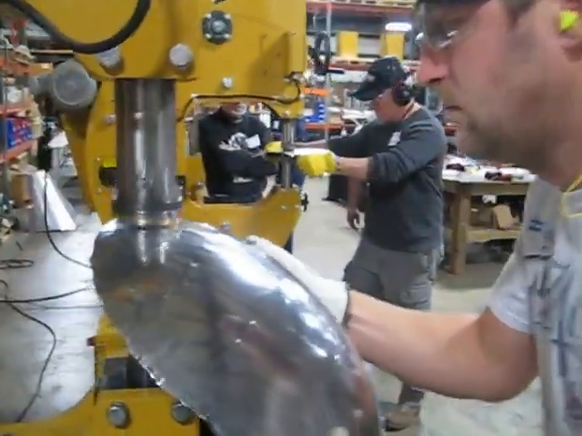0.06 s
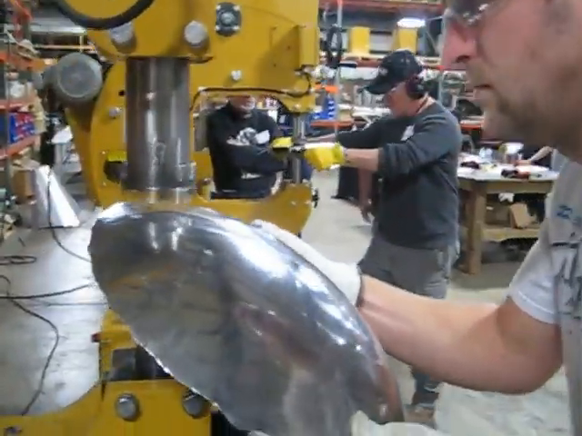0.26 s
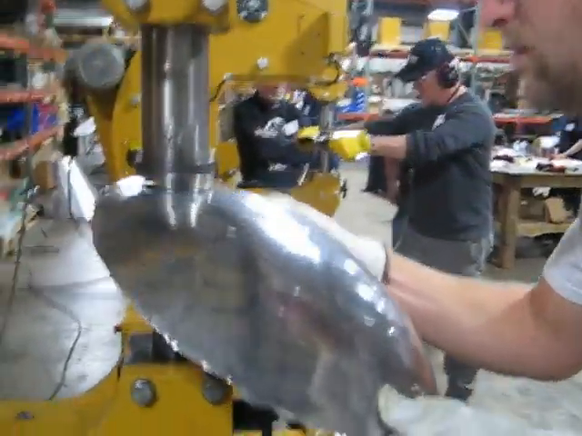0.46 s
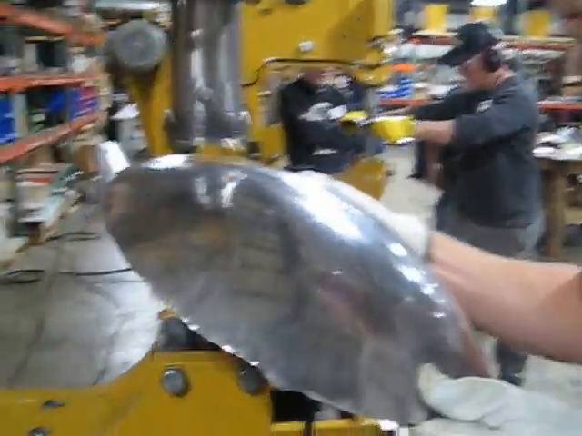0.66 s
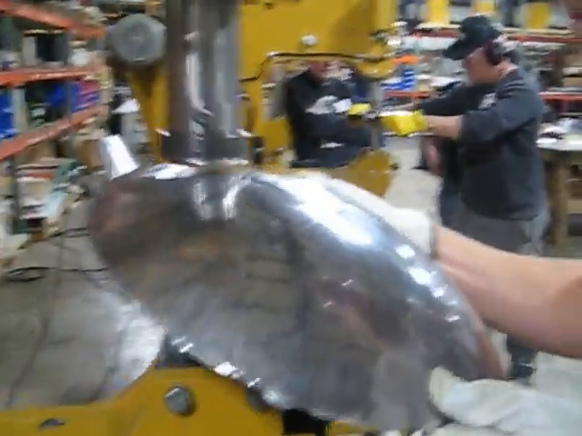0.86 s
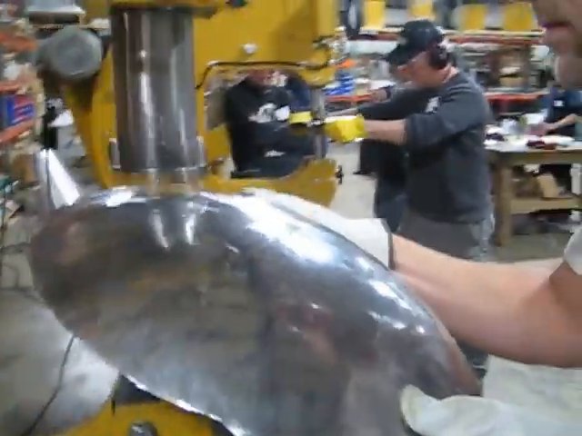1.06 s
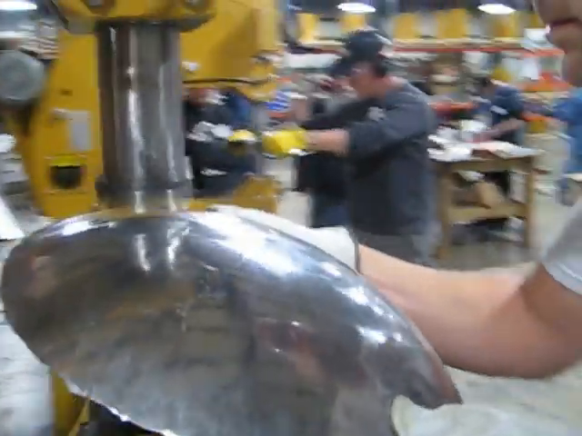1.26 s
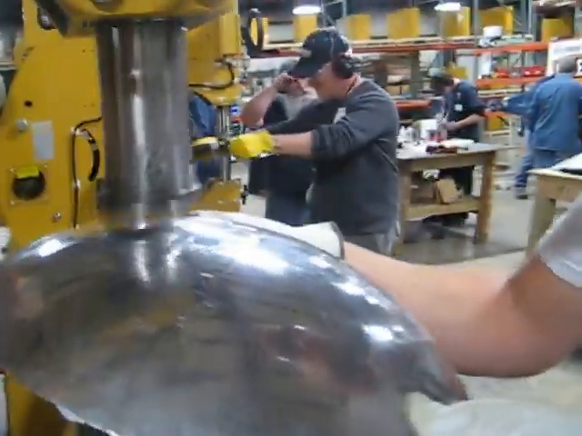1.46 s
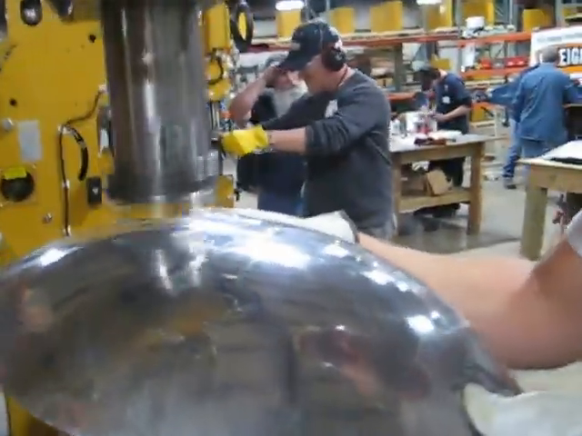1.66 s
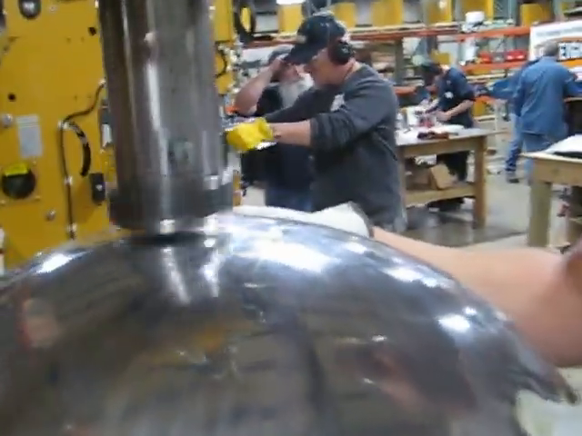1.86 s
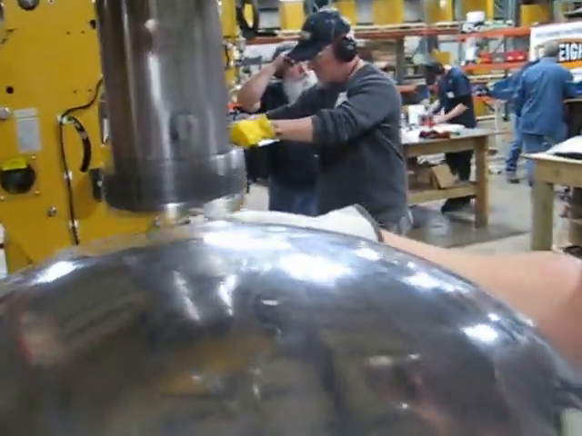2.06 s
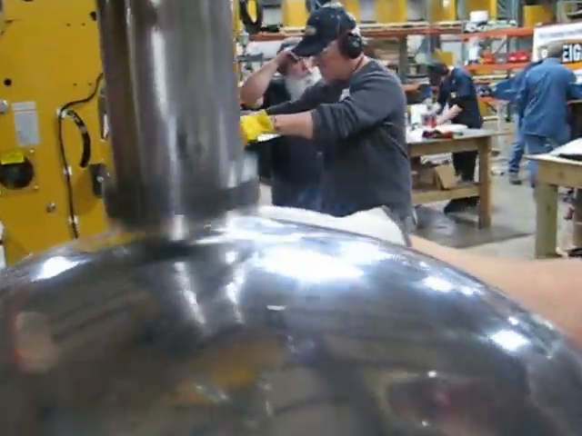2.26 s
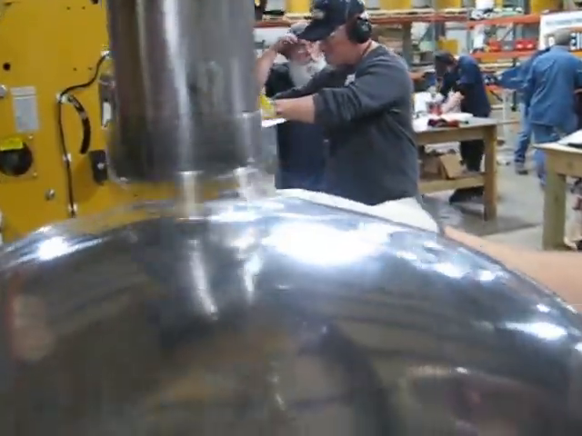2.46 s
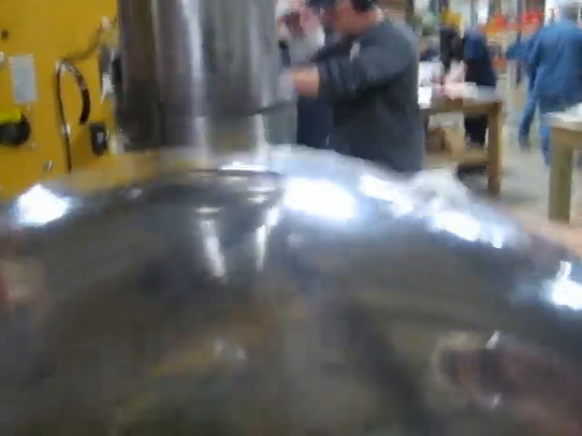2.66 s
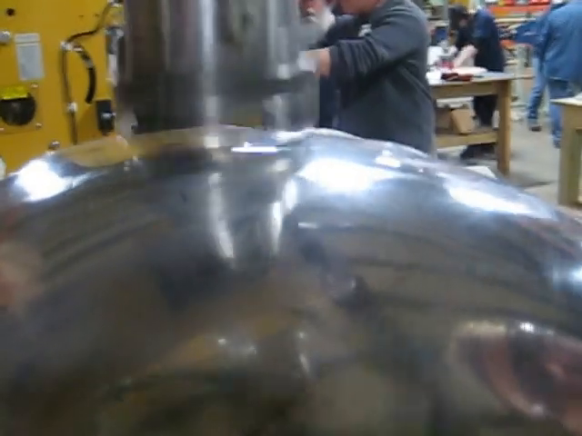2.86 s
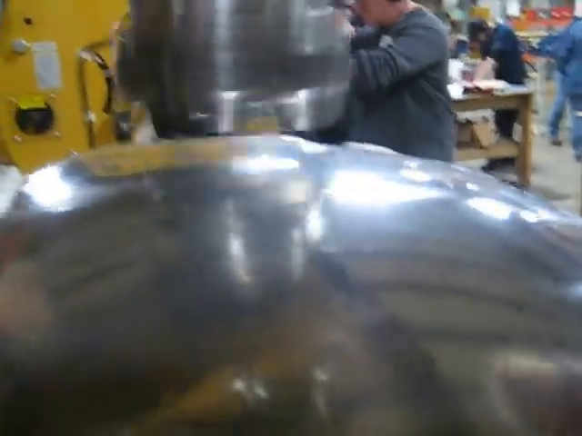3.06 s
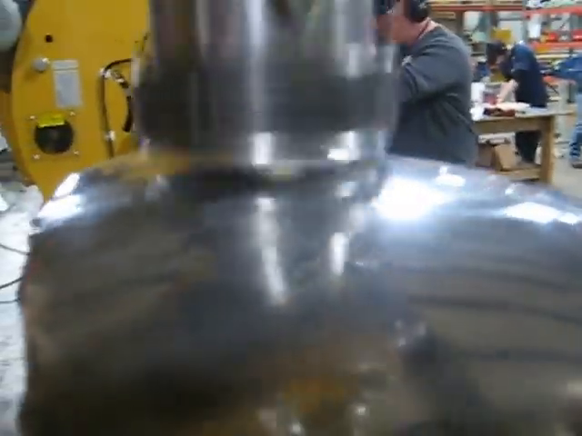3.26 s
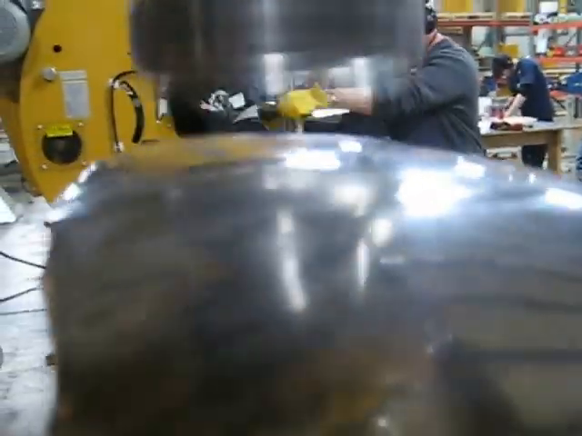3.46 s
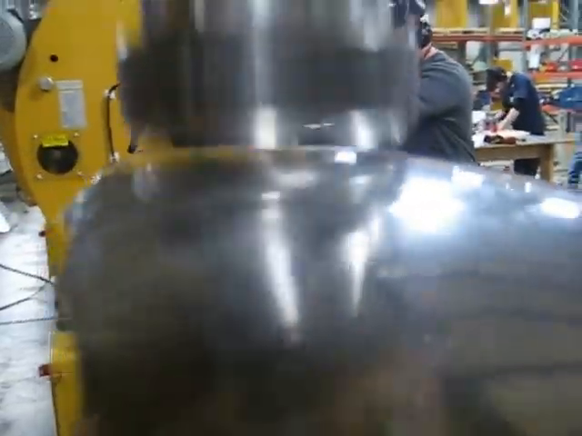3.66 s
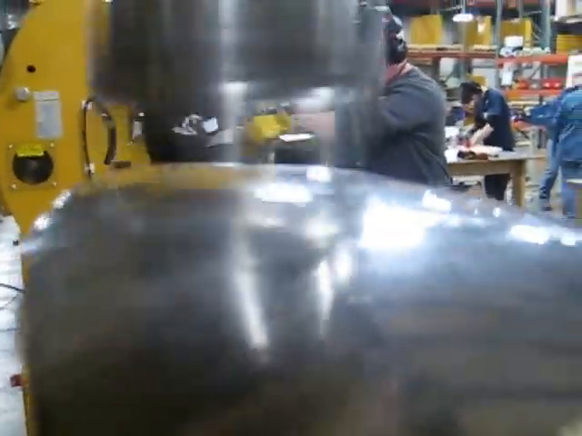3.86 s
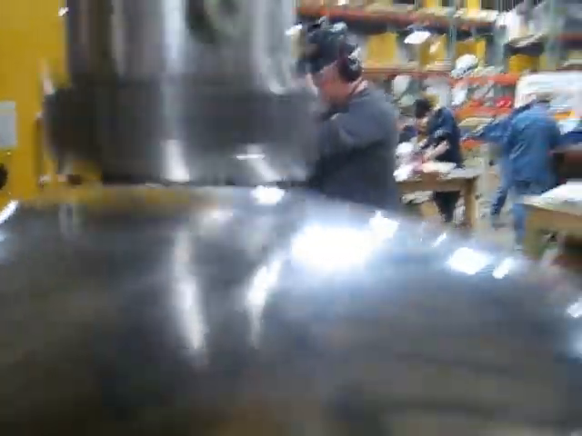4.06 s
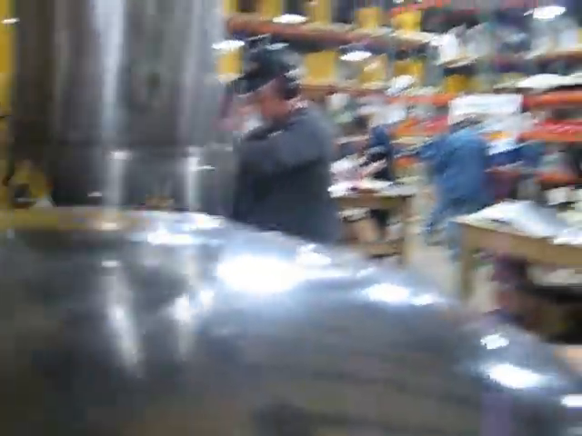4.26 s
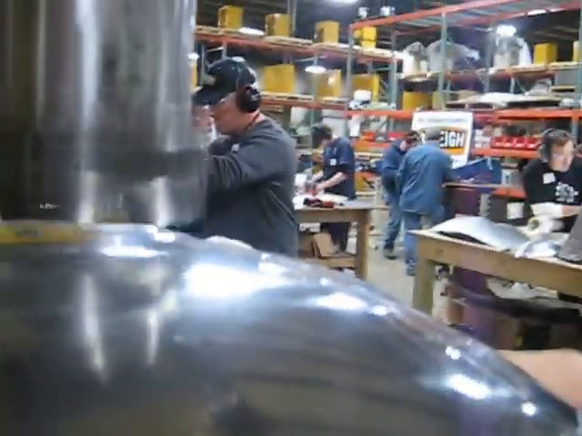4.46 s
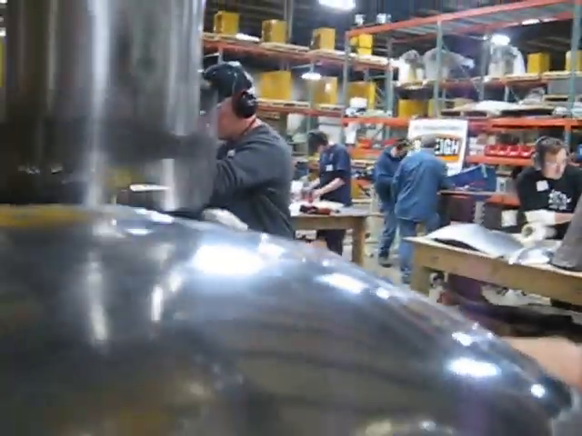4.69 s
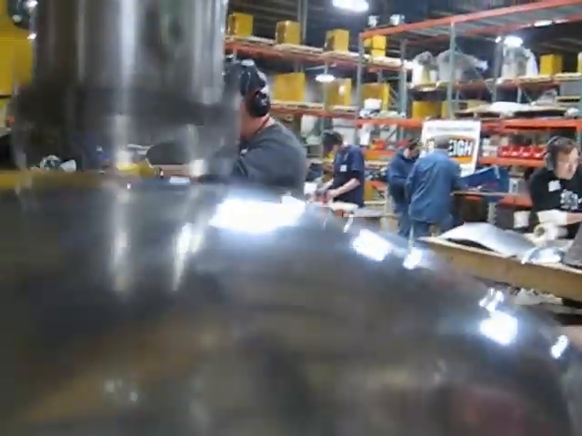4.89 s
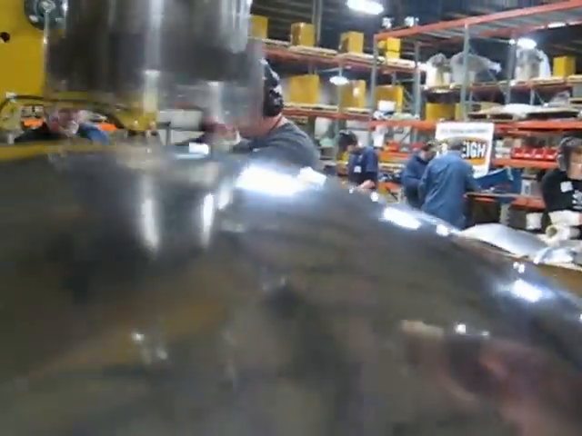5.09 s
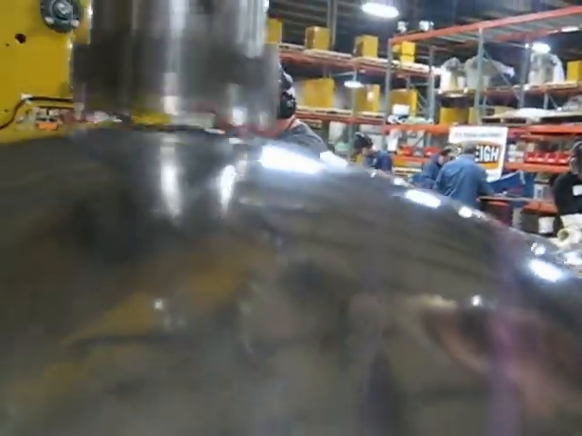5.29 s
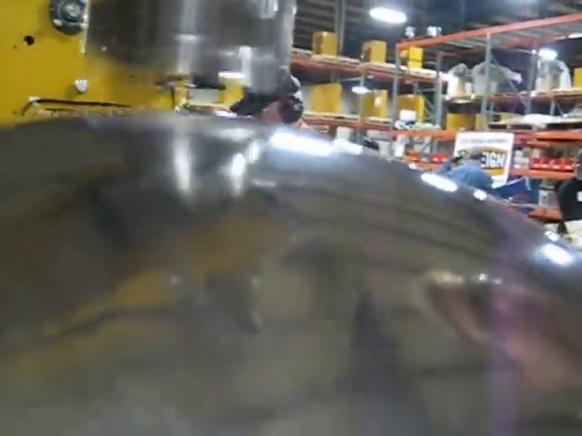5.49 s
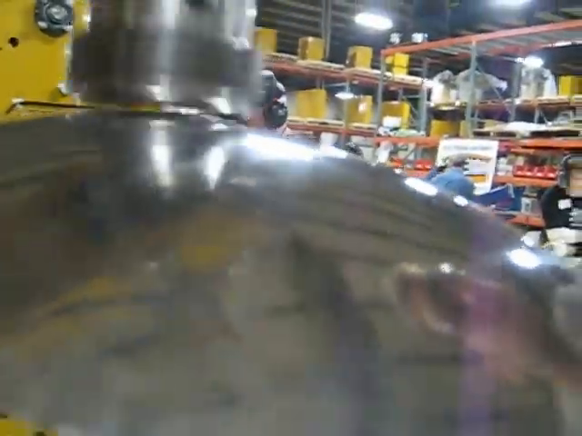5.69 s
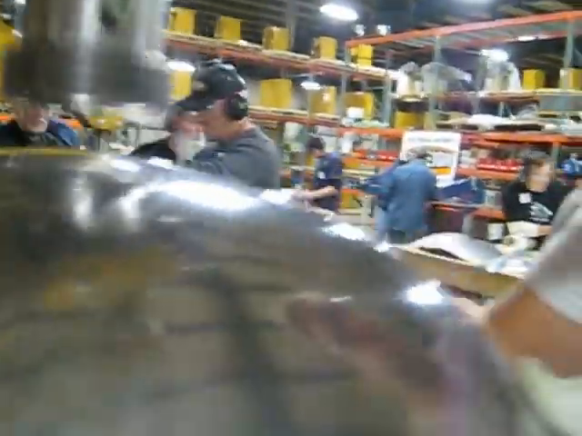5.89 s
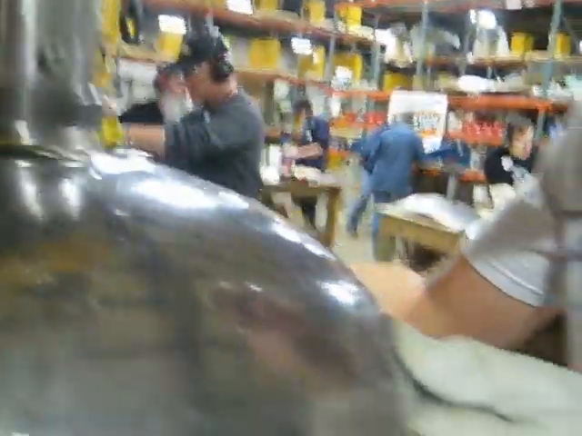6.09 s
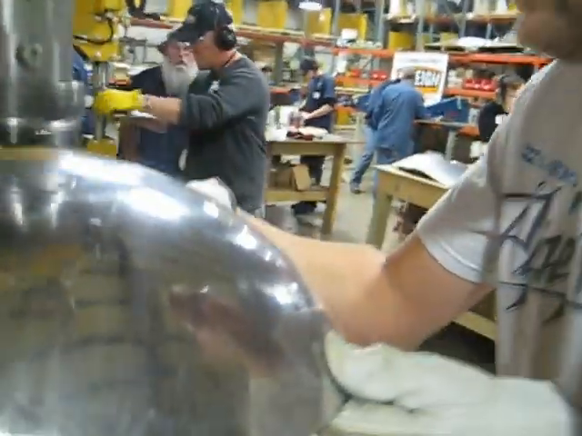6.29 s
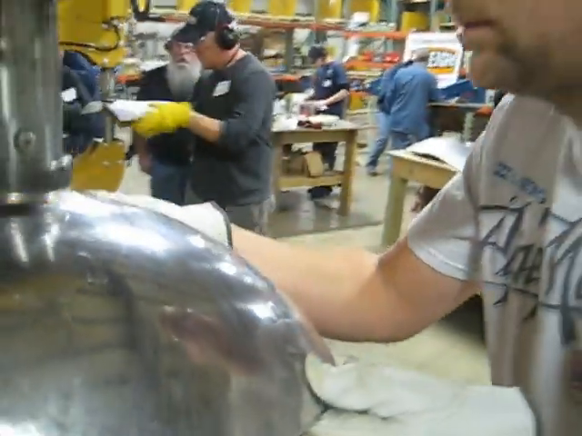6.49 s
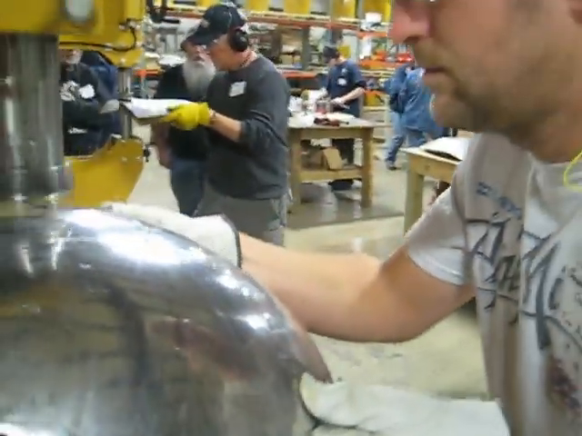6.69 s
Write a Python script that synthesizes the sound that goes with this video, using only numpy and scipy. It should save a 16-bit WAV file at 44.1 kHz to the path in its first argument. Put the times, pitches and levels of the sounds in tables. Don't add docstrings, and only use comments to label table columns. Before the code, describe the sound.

Continuous machine-gun-like metal hammering in a big workshop, already running at the start and never pausing. Dense tinny clanks around three kilohertz change slightly in pitch and force as the sheet slides under the die. Low frame ringing, bearing rumble and bright linkage clatter fill the gaps. The microphone circles close, with blunt thuds and harsh overload in the middle, and eases off a little near the end.

```python
import sys
import numpy as np
from scipy import signal
from scipy.fft import rfft, irfft, next_fast_len
from scipy.io import wavfile

SR = 44100
rng = np.random.default_rng(int(sys.argv[2]) if len(sys.argv) > 2 else 0)


def output_pcm(signal):
    pcm = np.clip(np.atleast_2d(signal).T, -1, 1) * 32767
    wavfile.write(sys.argv[1], SR, np.round(pcm).astype(np.int16))


def makeup_ratio(level_db):
    decades = np.asarray(level_db, float) / 20
    return 10 ** decades


N = 297234


def rms_one(x):
    return x / np.sqrt(np.mean(x ** 2) + 1e-20)


def at_hz(points, hz):
    table_hz, value = np.transpose(points)
    return np.interp(np.log(hz), np.log(table_hz), value)


def columns_at(table, s):
    table_s, *columns = np.transpose(table)
    return [np.interp(s, table_s, column) for column in columns]


def filtered(order, cut_hz, kind, x):
    return signal.sosfilt(signal.butter(order, cut_hz, kind, fs=SR, output="sos"), x)


def rings(hz, t60, length):
    t = np.arange(length) / SR
    decay_db = -60 * np.outer(1 / t60, t)
    return np.sin(2 * np.pi * np.outer(hz, t)) * makeup_ratio(decay_db)


def wander(shape, memory):
    draw = rng.standard_normal(shape)
    fresh = np.sqrt(1 - memory ** 2)
    return signal.lfilter([fresh], [1, -memory], draw, axis=0, zi=memory * draw[-1:])[0]


def lay(rows, starts):
    out = np.zeros(N + 2 * SR)
    stroke_before = 2 * starts[0] - starts[1]
    for s, row in zip([stroke_before, *starts], [rows[0], *rows]):
        at = SR + round(s * SR)
        out[at:at + len(row)] += row
    return out[SR:SR + N]


def shop_air():
    drone = filtered(2, [35, 320], "band", rng.standard_normal(N + SR))
    return makeup_ratio(-61) * rms_one(drone[SR:])


def hall(x):
    t60_s, cut_hz = 1, 840
    size = next_fast_len(N + SR)
    turn = np.exp(-2j * np.pi * np.fft.rfftfreq(size))
    dull = np.exp(-2 * np.pi * cut_hz / SR)
    wall = (1 - dull) / (1 - dull * turn)
    answer = 0
    for k, lag in enumerate((rng.uniform(0.015, .05, 12) * SR).astype(int)):
        loop = makeup_ratio(-60 * lag / SR / t60_s) * wall * turn ** lag
        answer = answer + (-1) ** k * loop / (1 - loop)
    for lag in (53, 131, 241):
        answer = answer * (turn ** lag - .6) / (1 - .6 * turn ** lag)
    return irfft(rfft(x, size) * answer, size)[:N]


# blow number, t/s
CRANK_TURNS = [
    (0, .0528),
    (48, 3.7873),
    (66, 5.2008),
    (85, 6.7022),
]


def crank_times():
    number, s = np.transpose(CRANK_TURNS)
    return np.interp(np.arange(number[-1] + 1), number, s)


# t/s after the blow, level/dB
STROKE_LEVEL = [
    (0, 14),
    (.02, 10),
    (.045, 5),
    (.056, 5),
    (0.056, 5),
    (.064, 6),
    (.078, 9.5),
]


def stroke_noise(rows):
    level_db, = columns_at(STROKE_LEVEL, np.arange(rows.shape[1]) / SR)
    return lay(rows * makeup_ratio(level_db), crank_times())


def rumble():
    rows = wander((len(crank_times()), round(.079 * SR)), memory=.9)
    return makeup_ratio(-33) * rms_one(filtered(2, [540, 950], "band", stroke_noise(rows)))


# t/s, share of the close view 0-1, share of the view beside the panel edge 0-1, frame level/dB
MICROPHONE_PLACE = [(0, 0, 0.16, 1.1), (.7, 0, 0.12, 0.8), (1.3, 0.21, 0.13, 1.9), (1.7, 0.47, 0.16, 1.5),
                    (2.1, 0, 0.76, -1), (2.4, 0.27, 0.49, 1), (2.8, 0.7, 0.27, 0.8), (3.4, 0.7, 0.2, 3),
                    (4, 0.95, 0.14, 1), (4.7, 0.52, 0.3, 3), (5.3, 0.99, 0.12, -0.5), (5.6, 0.38, 0.55, 1),
                    (5.95, 0.26, 0.7, 1), (6.25, 0.05, 0.61, 1.5), (6.74, 0.35, 0.08, 1.5)]
# f/Hz, level/dB per Hz
RATTLE_COLOUR = [(700, -3), (1300, -6), (1800, -7.5), (2400, -7), (3100, -5.5), (4000, -9), (5000, -13.5),
                 (6500, -14), (8400, -17.5), (11000, -24.5), (13400, -28.5), (16000, -44)]


def rattle():
    far_db, close_change_db, edge_change_db = -27, -1.5, -2.5
    shape = len(crank_times()), round(.079 * SR)
    uneven_db = 2.15 * rng.exponential(1, shape)
    knocks = stroke_noise(rng.standard_normal(shape) * makeup_ratio(uneven_db))
    hz = np.maximum(np.fft.rfftfreq(N, 1 / SR), 1)
    slope_db = 12 * np.log2(np.minimum(hz / RATTLE_COLOUR[0][0], 1))
    coloured = irfft(rfft(knocks) * makeup_ratio(at_hz(RATTLE_COLOUR, hz) + slope_db), N)
    close, edge, _ = columns_at(MICROPHONE_PLACE, np.arange(N) / SR)
    return rms_one(coloured) * makeup_ratio(far_db + close_change_db * close + edge_change_db * edge)


# f/Hz, t60/s, arrival/ms, resonance level/dB from afar, close by,
# beside the panel edge
FRAME_MODES = [(208.3, 0.5, 2.17, 18, 18.3, 24), (236, 0.16, 2.1, 6, 19, 5.4),
               (282.7, 0.5, 3.82, 11.5, 20.3, 21.6), (343, 0.24, 1.65, 23.5, 25, 26.3),
               (372, 0.3, 3.39, 16.5, 17, 8.8), (438.6, 0.055, 1.17, 10, 18.3, 33.4),
               (496.8, 0.22, 0.57, 3, 23.2, 37), (541.3, 0.15, 0.93, -8, 20, 43.2),
               (575.5, 0.39, 1.38, 31.5, 25.8, 35.3), (612.6, 0.25, 2.88, 18.5, 16, 38),
               (649, 0.34, 1.69, 33, 30.2, 30.3), (673, 0.2, 2.62, 14, 16, 31.4),
               (692, 0.34, 1.41, 20, 24.5, 38.7), (716, 0.18, 2.37, 24, 31, 11),
               (749.4, 0.095, 2.99, 24, 29.5, 27), (812, 0.19, 2.97, 25, 23, 16),
              (828, 0.39, 2.85, 28, 20, 22), (881, 0.069, 3.26, 20.5, 14.5, 20.5),
              (992, 0.061, 3.69, -4, 21.5, 16), (1079.5, 0.088, 4.196, 17, 24, 25.5),
              (1104.6, 0.052, 4.138, 31.5, 18.5, 13), (1168, 0.096, 4.057, 29, 29, 12.5),
              (1280, 0.19, 4.34, 21.5, 23, 7), (1300, 0.14, 4.536, 23, 28.5, 16.5),
              (1367, 0.032, 4.624, 21.5, 20, 8.5), (1593, 0.44, 3.27, -9, 10.5, 15),
              (1956, 0.23, 0.68, 9, 20.5, 30), (2920, 0.13, 1, 31, 26, 9.5)]


def frame():
    s = crank_times()[:, None]
    hz, t60, arrival_ms, far_db, close_db, edge_db = np.transpose(FRAME_MODES)
    close, edge, gain_db = columns_at(MICROPHONE_PLACE, s)
    level_db = far_db + close * (close_db - far_db) + edge * (edge_db - far_db)
    level_db = level_db + gain_db + 1.6 * wander((len(s), len(hz)), memory=.8)
    height = 2 * np.log(1000) / (t60 * SR)
    late = (arrival_ms * SR / 1000).astype(int)
    shapes = [np.pad(row, (lag, 0))[:len(row)] for row, lag in zip(rings(hz, t60, length=18000), late)]
    return lay(makeup_ratio(level_db) * height @ shapes, crank_times())


# t/s, extra peak level/dB, extra thud level/dB
ACCENTED_BLOWS = [(1.30, 1, 9), (1.45, 0, 8), (1.53, 0, 8), (2.08, 0, 8), (2.31, 1, 2), (2.62, 1, -12),
                  (2.70, 0, -17), (2.77, -0.5, 13), (2.93, 1.5, 1), (3.01, 0.5, -1), (3.24, 0, 0),
                  (3.48, 1, 10), (3.63, 0, 11.5), (3.32, -0.5, 6), (3.79, 0, 5), (4.10, 1.5, 2),
                  (4.34, 0.5, 7), (4.49, -1.5, 7), (4.65, -1, 9), (4.89, 3, 8), (4.97, 0, 14.5),
                  (5.04, -1, -18), (5.20, 1, 3), (5.28, .5, -14), (5.36, -0.5, 8.5), (5.75, -1, 20),
                  (5.60, 0, 8), (5.91, 2.5, 17), (6.23, 2, 13), (6.35, 2, 3), (6.54, 2, 15)]


def accents():
    s, *extra_db = np.transpose(ACCENTED_BLOWS)
    out = np.zeros((2, len(crank_times())))
    nearest_blow = np.abs(crank_times() - s[:, None]).argmin(axis=1)
    out[:, nearest_blow] = extra_db
    return out[:, :, None]


# t/s, blow peak level/dB, loudest panel tone f/Hz,
# low panel level/dB against the peak, bright panel level/dB against the peak
PANEL_WORK = [(0, -6, 2960, -16, -11.5), (.4, -4.5, 3400, -18.5, -12), (.65, -5.5, 3860, -17.5, -10),
              (.87, 0, 3630, -19.5, -15), (1.35, -6.5, 3050, -11.5, -9), (1.7, -5, 2980, -13, -11.5),
              (1.9, -2, 3630, -9.5, -14), (2.15, -1, 2340, -7, -12), (2.7, 1, 3620, -14, -14),
              (3.05, 2, 2840, -10, -14), (3.35, 1.5, 3640, -10.5, -10.5), (3.7, .5, 3100, -16, -8.5),
              (4.02, 4.5, 3100, -13.5, -13), (4.3, 0, 2910, -13.5, -11), (4.8, 2.5, 2960, -15.5, -11),
              (5.4, -0.5, 3600, -13.5, -13), (6.05, -2, 2450, -14.5, -11), (6.74, -3.5, 2950, -12, -13)]


def work():
    s = crank_times()[:, None]
    peak_db, tone_hz, low_db, bright_db = columns_at(PANEL_WORK, s)
    force, low_spot, high_spot = rng.standard_normal((3, len(s), 1))
    peak_db = peak_db + accents()[0] + 0.74 * force
    return s, peak_db, tone_hz + 246 * low_spot, 6260 + 690 * high_spot, low_db, bright_db


def thud_db():
    s = crank_times()[:, None]
    extra_peak_db, extra_thud_db = accents()
    peak_db = columns_at(PANEL_WORK, s)[0] + extra_peak_db
    close = columns_at(MICROPHONE_PLACE, s)[0]
    scatter_db = 2.0 * rng.standard_normal(s.shape)
    return -49 + 1.4 * peak_db + 17 * close + extra_thud_db + scatter_db


def thump(blows):
    tallest = np.abs(np.tanh(blows)) ** 9.5
    lopsided = filtered(2, 900, "low", filtered(1, [75, 700], "band", tallest))
    lopsided /= np.sqrt(np.mean(lopsided[:, :350] ** 2, axis=1, keepdims=True))
    return -makeup_ratio(thud_db()) * lopsided


# f/Hz, level/dB per Hz
PANEL_COLOUR = [(820, -42), (1400, -12), (1900, -13), (2000, -6.5), (2550, -4), (2860, -1.5), (3720, -1.5),
                (4960, -8.5), (6940, -5), (7680, -9), (8420, -9), (12400, -20.5), (15100, -31),
                (16000, -38)]
# f/Hz, t60/s
PANEL_RING = [(1400, 0.06), (2000, 0.066), (3500, 0.041), (5500, 0.033), (8000, 0.023), (11000, 0.021),
              (15000, 0.041)]


def panel():
    s, peak_db, tone_hz, high_hz, low_db, bright_db = work()
    count = 320
    hz = 1400 + 15000 * ((np.arange(count) + rng.random(count)) / count) ** 1.6
    ring_s = at_hz(PANEL_RING, hz)
    colour_db = at_hz(PANEL_COLOUR, hz) + 10 * np.log10(np.gradient(hz) / ring_s)
    colour_db = colour_db + (low_db - low_db.mean()) * (hz < 2600)
    for spot_hz, favour_db in ((tone_hz, 3.9), (high_hz, 5.6)):
        colour_db = colour_db + favour_db * np.exp(-((hz - spot_hz) / 130) ** 2)
    strength = wander((len(s), count), memory=0.7) * makeup_ratio(colour_db)
    for part, part_db in ((hz < 4500, peak_db - 2.0), (hz >= 4500, peak_db + bright_db + 9.5)):
        strength[:, part] *= makeup_ratio(part_db) / np.sqrt(np.sum(strength[:, part] ** 2, axis=1, keepdims=True))
    t60 = ring_s * makeup_ratio(rng.normal(0, 0.55, count))
    swell = 1 - np.exp(-np.arange(6000) / SR / 0.00034)
    held = rings(hz, t60, length=6000)
    free = makeup_ratio(-17.5) * rings(hz, 2.74 * t60, length=6000)
    return strength @ (held + free) * swell


def scene():
    blows, starts = panel(), crank_times()
    starts = starts + .0004 * rng.standard_normal(len(starts))
    metal = filtered(4, 190, "high", lay(blows, starts) + frame())
    room = shop_air() + rumble() + makeup_ratio(-28.5) * hall(metal)
    return (room + rattle() + lay(thump(blows), starts) + metal)[None]


def band_limit(x):
    return signal.sosfilt(signal.butter(12, 16800, fs=SR, output="sos"), x)


def record(dry):
    knee, ceiling = 8, .75
    clipped = dry / (1 + np.abs(dry / ceiling) ** knee) ** (1 / knee)
    top_cut = signal.cheby2(8, 32, 16300, fs=SR, output="sos")
    return band_limit(signal.sosfiltfilt(top_cut, clipped))


dry = scene()
out = record(dry)
output_pcm(out)
```